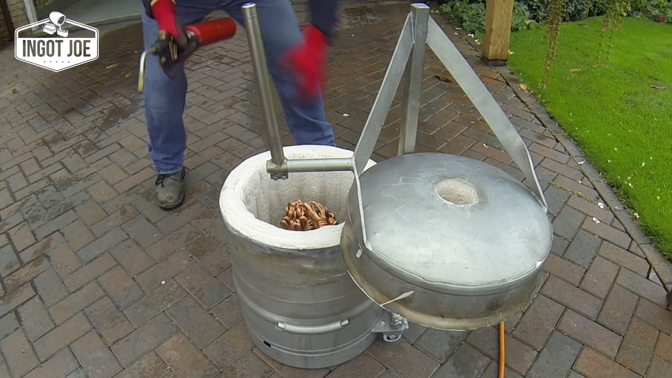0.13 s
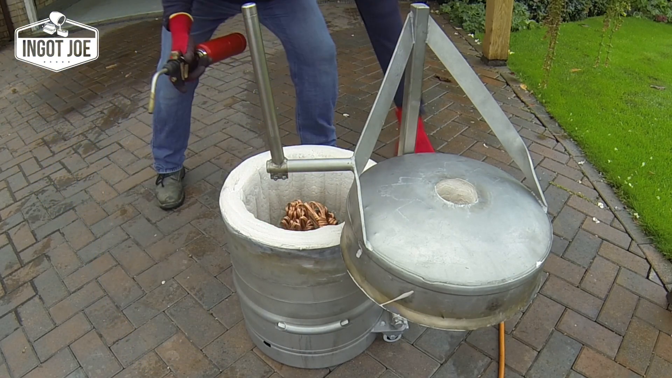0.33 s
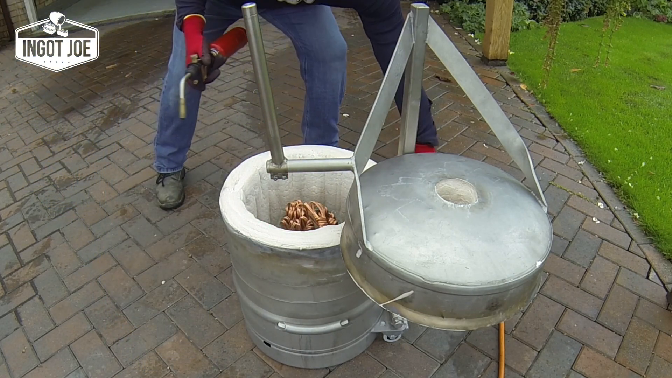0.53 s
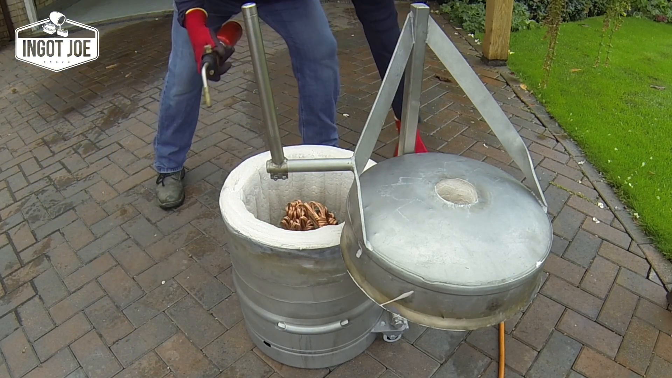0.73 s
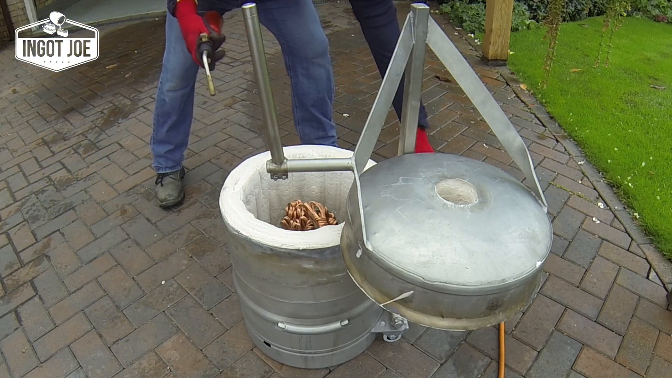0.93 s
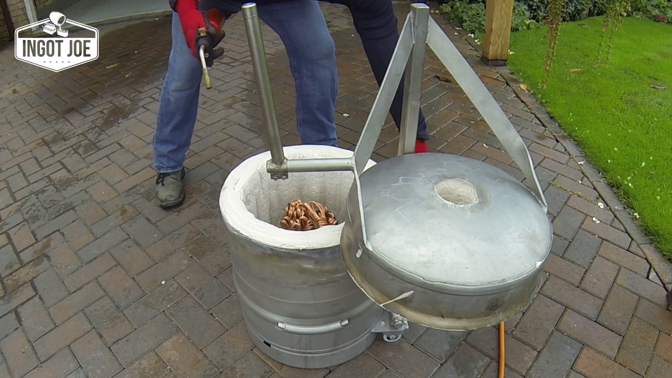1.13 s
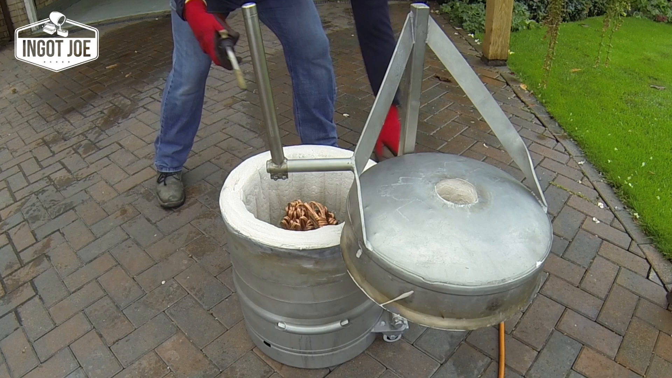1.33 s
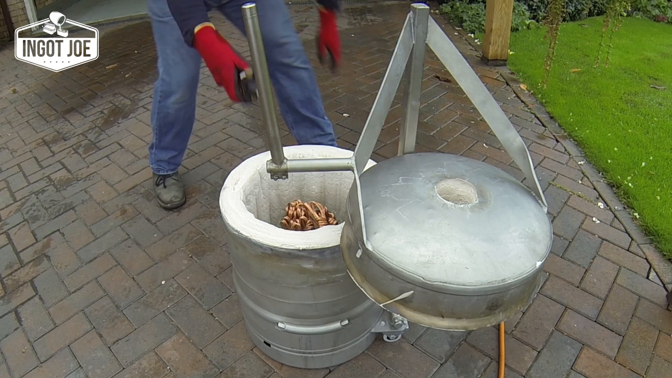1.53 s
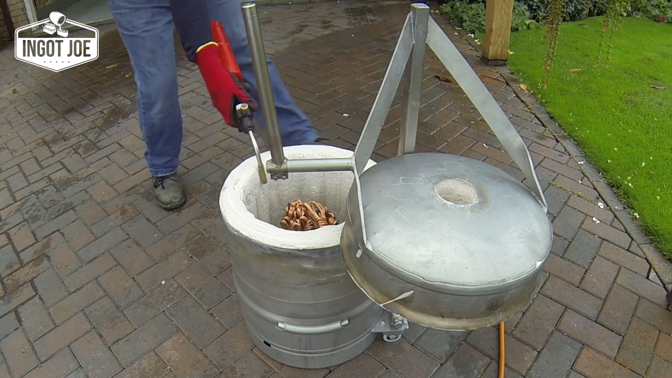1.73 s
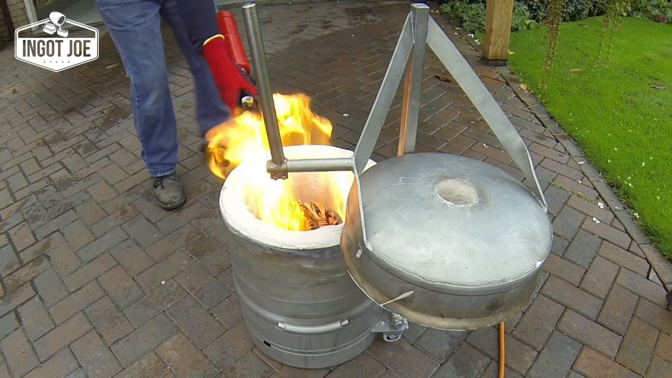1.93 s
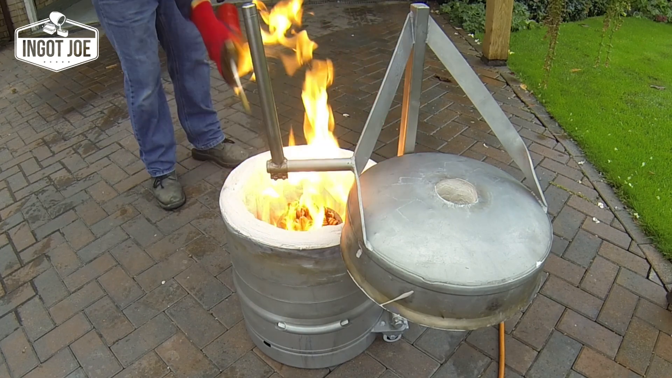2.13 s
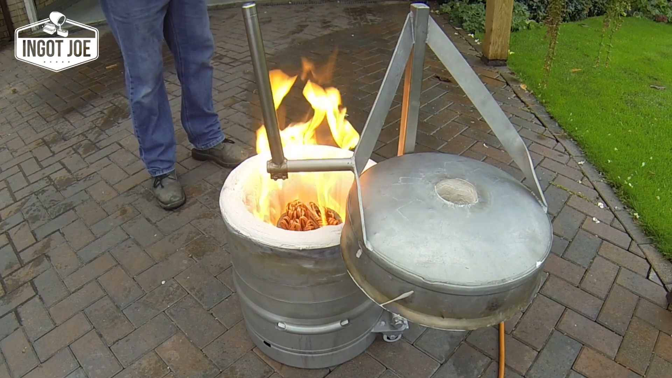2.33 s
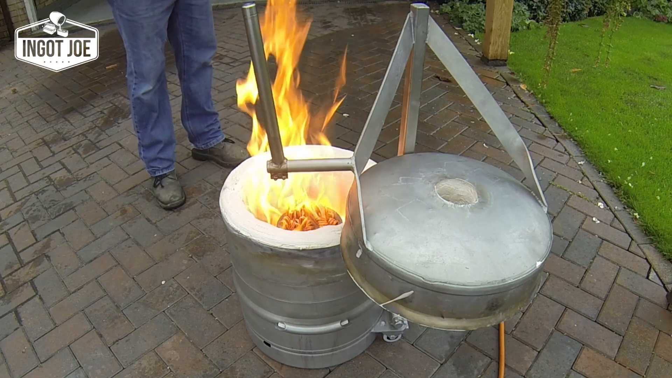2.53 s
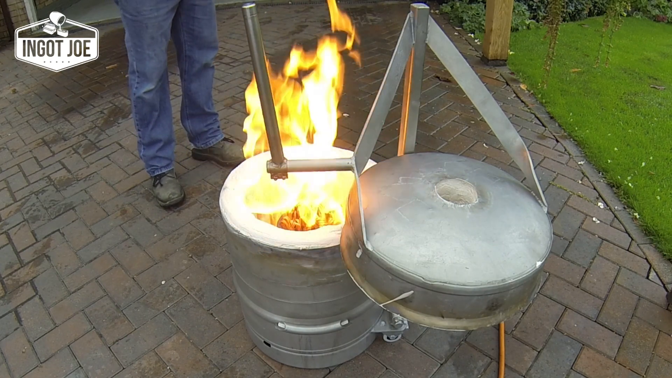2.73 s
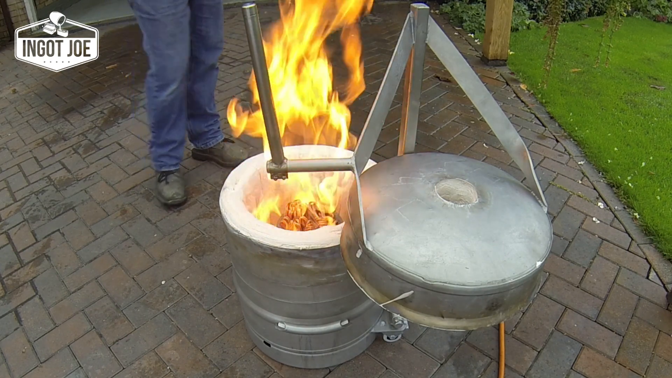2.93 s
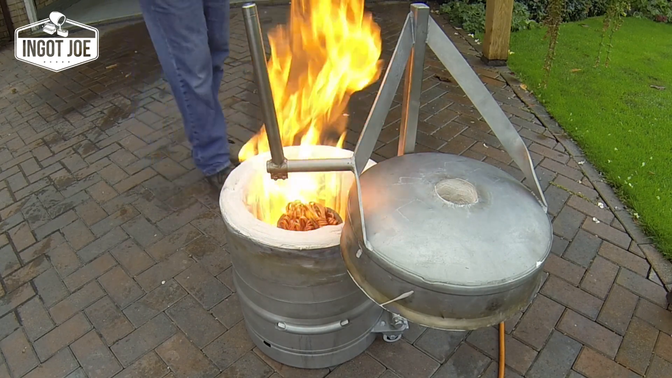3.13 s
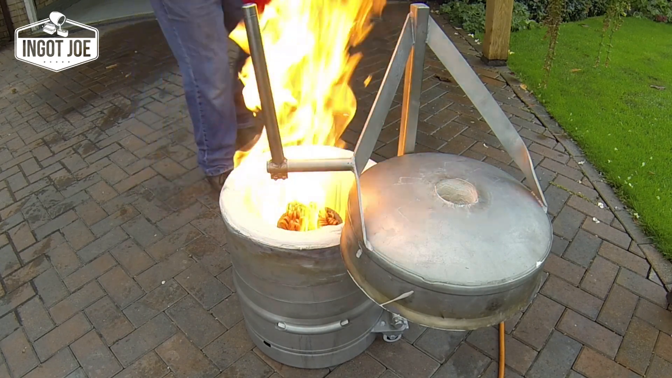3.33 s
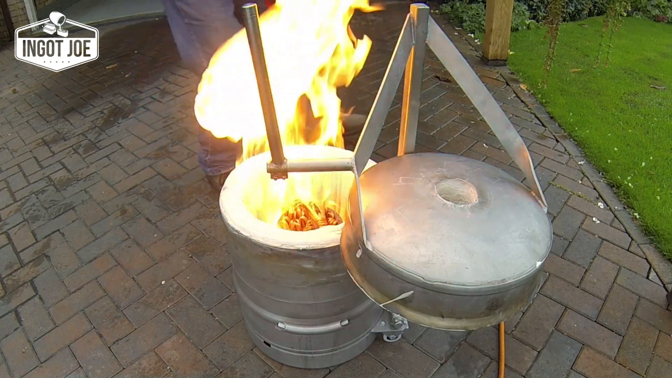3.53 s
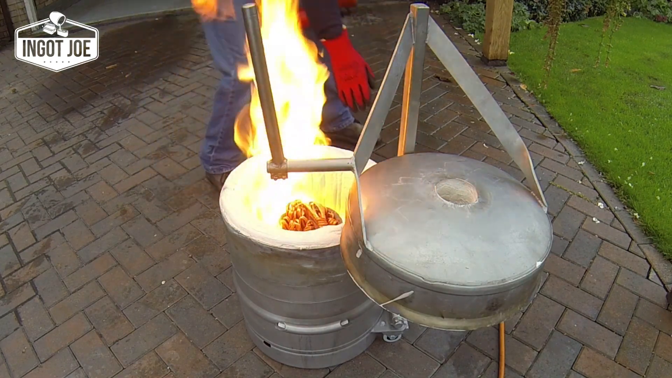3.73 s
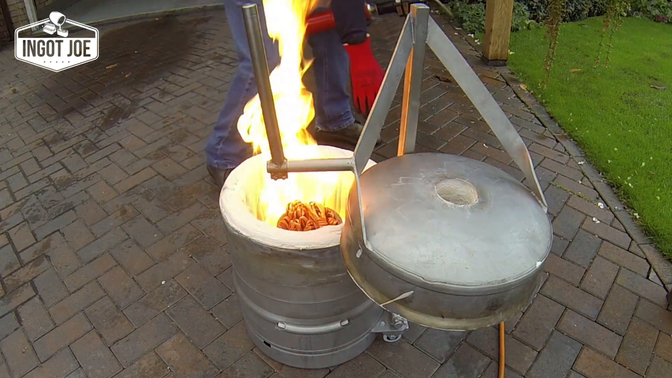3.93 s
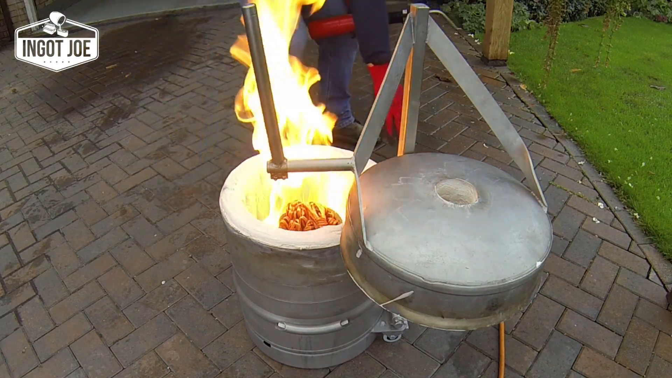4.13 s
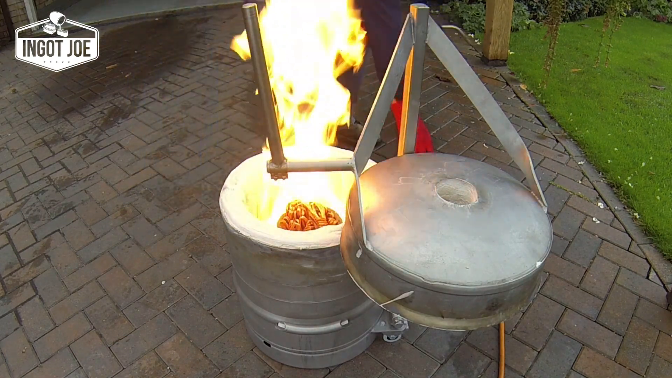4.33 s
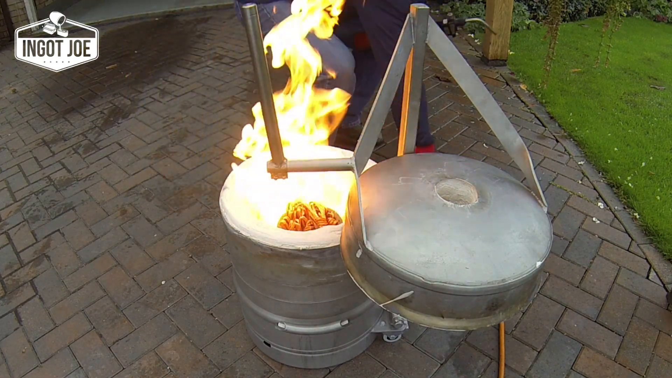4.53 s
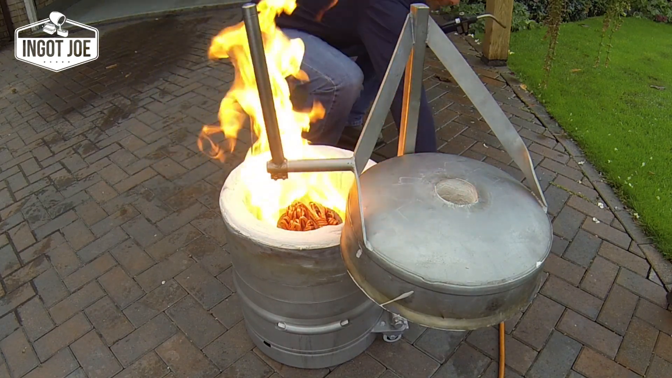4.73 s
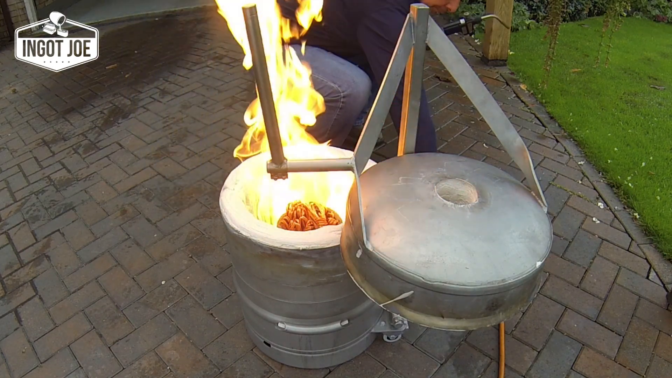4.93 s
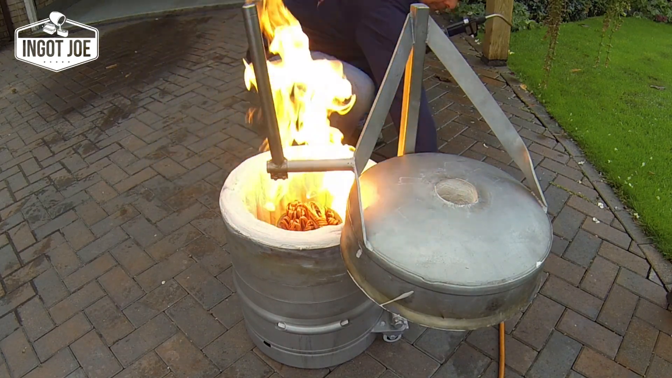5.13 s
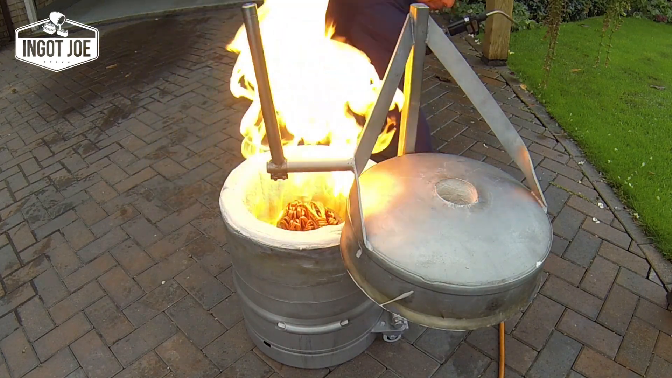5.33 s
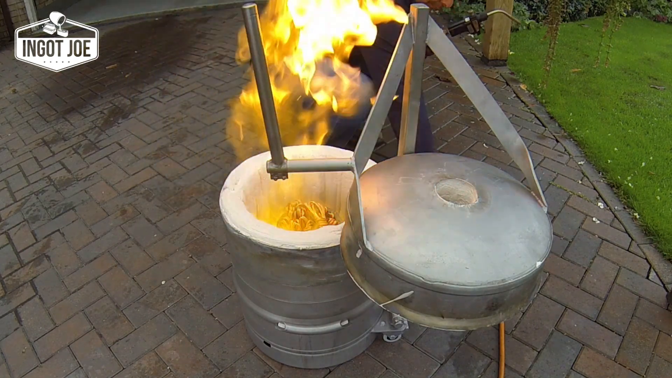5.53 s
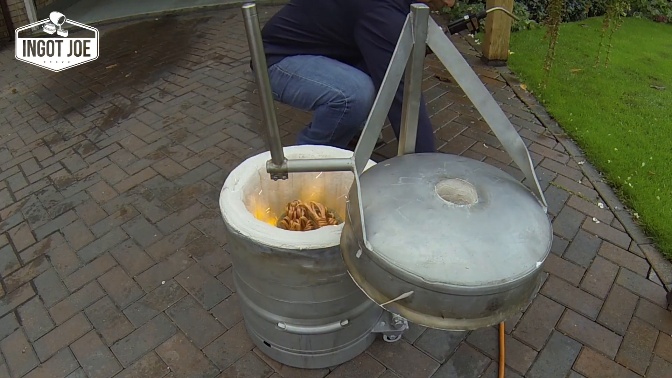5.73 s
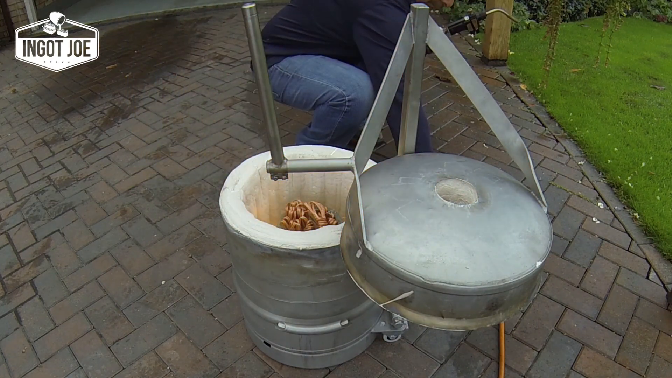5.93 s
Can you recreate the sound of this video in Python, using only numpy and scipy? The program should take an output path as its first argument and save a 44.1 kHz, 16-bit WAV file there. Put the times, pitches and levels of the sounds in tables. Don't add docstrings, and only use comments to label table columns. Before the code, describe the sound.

On a paved yard with faint traffic hum, boots step and a lighter is handled. A valve opens with a soft puff and a bright steady gas hiss. A lighter snaps and the gas ignites in a short thumping whoosh, followed by a soft low flutter under the hiss with scattered footsteps. Finally metal scrapes as the valve is jerked up, and a booming roar builds in the drum. Close stereo camera microphone.

```python
import sys
import numpy as np
from scipy import signal
from scipy.fft import rfft, irfft, next_fast_len
from scipy.io import wavfile

SR = 44100
rng = np.random.default_rng(int(sys.argv[2]) if len(sys.argv) > 2 else 0)


def bounce(signal):
    frames = np.transpose(np.atleast_2d(signal))
    limited = np.clip(frames, -1, 1)
    pcm = np.round(limited * 32767).astype(np.int16)
    wavfile.write(sys.argv[1], SR, pcm)


def voltage_ratio(decibels):
    exponent = np.asarray(decibels, float) / 20
    return 10 ** exponent


N = 268833
SIZE = next_fast_len(N + SR // 2)
HZ = np.fft.rfftfreq(SIZE, 1 / SR)
LIGHTS_S = 1.72
# (frequency [Hz], width [Hz], lift [dB])
DRUM_MODES = [(77, 33, 8.5), (159.7, 14, 8.5), (232.9, 3.7, 13.5), (308, 21, 6), (358.7, 28, 11),
              (467.6, 13, 9.5), (553, 48, 8), (750, 62, 4.5)]


def rms_one(x):
    return x / np.sqrt(np.mean(x ** 2) + 1e-20)


def in_time(rows, start=None):
    s, *columns = np.transpose(rows)
    first = round((start or s[0]) * SR)
    t = np.arange(first, min(round(s[-1] * SR), N)) / SR
    return [first] + [np.interp(t, s, column) for column in columns]


def at_hz(points, grid):
    hz, value = np.transpose(points)
    return np.interp(np.log(grid + 1), np.log(hz), value)


def placed(first, x):
    return np.pad(x, (first, N - first - len(x)))


def ramp(t, start, length):
    return np.clip((t - start) / np.clip(length, .003, 1), 0, 1)


def lifts(modes, grid):
    peaks = [(voltage_ratio(db) ** 2 - 1) / (1 + (2 * (grid - hz) / width) ** 2) for hz, width, db in modes]
    return np.sqrt(1 + sum(peaks))


def drift(rate, size):
    r = np.exp(-80 * np.pi * rate / SR)
    chance = rng.standard_normal(N // 40 + 2002)
    slow = rms_one(signal.lfilter([1], [1, -2 * r, r * r], chance)[2000:])
    return np.interp(np.arange(size) / 40, np.arange(len(slow)), slow)


def ring(drive, hz, t60):
    r, w = voltage_ratio(-60 / (t60 * SR)), 2 * np.pi * hz / SR
    return signal.lfilter([0, np.sin(w)], [1, -2 * r * np.cos(w), r * r], drive + 1e-18)


def turbulence(size, colour, modes, centres, shared_db, own_db, rate):
    padded = next_fast_len(size + 4096)
    grid = np.fft.rfftfreq(padded, 1 / SR)
    noise = rfft(rng.standard_normal(N + 8192)[:padded], padded)
    noise = noise * voltage_ratio(at_hz(colour, grid)) * lifts(modes, grid)
    noise = noise / (1 + (grid / (2 * colour[-1][0])) ** 4)
    noise = noise * grid ** 2 / (grid ** 2 + colour[0][0] ** 2)
    together = shared_db * drift(rate, size)
    bands = []
    for one in np.eye(len(centres)):
        share = at_hz(list(zip(centres, one)), grid)
        flicker = voltage_ratio(together + own_db * drift(2 * rate, size))
        bands.append(irfft(noise * share, padded)[:size] * flicker)
    bands = np.array(bands)
    return bands / np.std(bands.sum(axis=0))


def traffic():
    # (frequency [Hz], density [dB per Hz])
    yard_colour = [(25, -19), (45, 2), (65, 11), (100, -2.5), (200, -4.5), (500, -15.5), (1000, -11.5),
                   (2000, -36.5), (4000, -31), (9000, -26.5), (13000, -28.5), (15500, -41)]
    # (time [s], level [dB])
    swell = [(0.0, -53.5), (0.208, -59.5), (0.894, -58.5), (1.03, -59.5)]
    level_db = -51.5
    centres = [60, 180, 600, 2500, 9000]
    hum = turbulence(N, yard_colour, [], centres, shared_db=.3, own_db=.8, rate=5.0).sum(axis=0)
    s, swell_db = np.transpose(swell)
    return voltage_ratio(level_db + np.interp(np.arange(N) / SR, s, swell_db - swell_db.mean())) * hum


def steps():
    # (time [s], peak [dB], pitch of the sole [Hz], t60 [s], hardness of the heel [dB])
    boots = [
        (0.037, -30.5, 484, 0.14, -43),
        (0.475, -43.5, 261, 0.043, -15),
        (2.207, -33.5, 305, 0.025, -16),
        (2.715, -32, 327, 0.12, -32),
        (3.093, -29.5, 340, 0.029, -14),
        (3.574, -30.5, 363, 0.031, -24),
        (3.654, -28, 504, 0.11, -11),
        (3.923, -49, 340, 0.051, -10),
        (4.227, -29, 284, 0.037, -9),
        (4.764, -69, 316, 0.093, 21.5),
    ]
    slap_delay_s, slap_share = .0115, 0.23
    t = np.arange(SR // 4) / SR
    out = np.zeros(N + SR)
    chance = rng.standard_normal((len(boots), 2, len(t)))
    for (s, db, hz, t60, hard_db), (noise, grit) in zip(boots, chance):
        slap = slap_share * (np.arange(len(t)) == round(slap_delay_s * SR))
        drive = (t == 0) + slap + 0.072 * noise * np.exp(-t / 0.019)
        body = ring(drive, hz, t60)
        body = body - 0.48 * ring(drive, 0.653 * hz, t60) - 1.03 * ring(drive, 1.43 * hz, 0.11 * t60)
        thump = 0.15 * ring(drive, 210, 0.027)
        scuff = 0.057 * ring(grit * np.exp(-t / 0.07), 1.24 * hz, 0.0098)
        heel = ring(grit * np.exp(-t / 0.019), 970, 0.0052)
        hit = body + thump + scuff
        step = hit / np.abs(hit).max() + voltage_ratio(hard_db + 4.5) * heel / np.abs(heel).max()
        out[round(s * SR):][:len(t)] += voltage_ratio(db - 1.0) * step
    return out[:N]


def bird():
    # (start [s], end [s], first pitch [Hz], last pitch [Hz])
    start, end, first_hz, last_hz = (.161, .218, 1660, 1740)
    level_db = -58
    t = np.arange(N) / SR
    phase = 2 * np.pi * np.cumsum(np.interp(t, [start, end], [first_hz, last_hz])) / SR
    gate = np.interp(t, [start, start + .004, end - .006, end], [0, 1, 1, 0])
    return voltage_ratio(level_db + 1.5 * drift(30, N)) * gate * np.sin(phase)


def scrapes():
    # (time [s], peak [dB], length [s], ring of the metal [dB])
    slips = [
        (0.253, -50, 0.014, -7),
        (0.563, -43, 0.031, -6.5),
        (0.691, -51.5, 0.04, -15),
        (1.958, -26.5, 0.019, -5.5),
        (5.177, -23, 0.039, -11.5),
        (5.456, -39, 0.03, -15),
        (5.483, -26.5, 0.03, -4.5),
        (5.729, -24, 0.021, -23),
        (5.767, -22, 0.053, -9),
    ]
    # (frequency [Hz], level [dB], t60 [s])
    lighter_modes = [(1980, -7, .01), (2850, -5, .01), (4900, -7, .008), (5800, -8, .008)]
    # (frequency [Hz], level [dB], t60 [s])
    valve_modes = [(1200, -4, .006), (1560, -3, .007), (1830, -2, .007), (2280, -4, .006), (6130, 2, .07),
                   (6900, -8, .03), (7970, -6, .03), (8600, 0, .017), (13500, -10, .006)]
    lighter_away_s = 2.5
    t = np.arange(SR // 4) / SR
    out = np.zeros(N + SR)
    chance = rng.standard_normal((len(slips), 2, len(t)))
    for (s, db, length, metal_db), (noise, roughness) in zip(slips, chance):
        envelope = np.minimum(t / .004, 1) * np.exp(-(t / np.clip(length, .008, .07)) ** 2)
        slip = noise * voltage_ratio(3 * roughness) * envelope
        modes = lighter_modes if s < lighter_away_s else valve_modes
        bright = signal.lfilter([1, -1], [1, -.88], signal.lfilter([.7, .3], [1, -.25], slip))
        metal = sum(voltage_ratio(mode_db) * ring(slip, hz, t60) / np.sqrt(t60 * SR) for hz, mode_db, t60 in modes)
        out[round(s * SR):][:len(t)] += voltage_ratio(db - 7.5) * (bright + voltage_ratio(14.5 + metal_db) * metal)
    return out[:N]


def song(modes, first):
    shape = sum(voltage_ratio(db) / (1 + (2 * (HZ - hz) / width) ** 2) for hz, width, db in modes)
    return rms_one(irfft(rfft(rng.standard_normal(SIZE)) * shape, SIZE)[first:N])


def tube_levels(first):
    cold_db, lit_db, rest_db, blown_db = -62, -46.5, -61, -51
    fade_db_per_s = 6.5
    next_cold_db, warming_db_per_s = -70, 2.5
    drowned_s, drowned_db = 5.1, -72
    blown_s, rise_s = 5.2, .06
    t = np.arange(first, N) / SR
    lit = np.maximum(lit_db - fade_db_per_s * (t - LIGHTS_S), rest_db)
    lowest = cold_db + ramp(t, LIGHTS_S, rise_s) * (lit - cold_db)
    lowest = lowest + ramp(t, blown_s, rise_s) * (blown_db - lowest)
    warm = next_cold_db + warming_db_per_s * (t - t[0])
    return lowest, warm + ramp(t, drowned_s, rise_s) * (drowned_db - warm)


def jet():
    # (time [s], level [dB])
    flow = [(1.15, -42.5), (1.4, -43.5), (1.66, -43), (1.77, -44), (1.91, -49), (2.15, -46), (2.4, -48),
            (2.66, -45), (2.79, -48), (3.01, -46.5), (3.35, -47.5), (3.86, -47.5), (4.3, -45), (4.83, -48),
            (5.12, -45), (5.31, -50.5), (5.53, -43.5), (6.1, -48.5)]
    # (start [s], fully open [s])
    valve_opens = (1.034, 1.058)
    # (frequency [Hz], density [dB per Hz])
    jet_colour = [(200, -26), (500, -20.5), (1000, -10.5), (2000, -10.5), (3000, -7), (4500, -6.5),
                  (8000, 0), (11500, 0.5), (14000, -1), (15500, -5.5)]
    # (frequency [Hz], width [Hz], lift [dB])
    tube_low = [(1354, 40, 10), (1845, 100, 5.5), (2380, 36, 3), (2604, 54, 3)]
    # (frequency [Hz], width [Hz], lift [dB])
    tube_high = [(2550, 500, -9.5), (3173, 20, 5.5), (3680, 37, 6.5), (3977, 41, 6.5), (4420, 18, 10.5),
                 (5016, 210, 5.5), (5600, 27, 3), (6240, 62, 3.5), (6960, 55, 0)]
    waver_db = 1.5
    first, hiss_db = in_time(flow, valve_opens[0])
    lowest_db, next_db = tube_levels(first)
    centres = [800, 2000, 2600, 3300, 4200, 5300, 6700, 8500, 11500, 14000]
    hiss = turbulence(N - first, jet_colour, tube_high, centres, shared_db=.4, own_db=1.2, rate=5.0)
    hiss = hiss.sum(axis=0)
    sing = voltage_ratio(lowest_db) * song(tube_low[:1], first) + voltage_ratio(next_db + 7.5) * song(tube_low[1:], first)
    sing = sing * voltage_ratio(waver_db * drift(3.3, N - first))
    opening = np.interp(np.arange(N) / SR, valve_opens, [0, 1]) ** 2
    return opening * placed(first, voltage_ratio(hiss_db + 9.0) * hiss + sing)


def flame(size, colour, shared_db, own_db, rate):
    centres = [50, 100, 200, 370, 800, 1600, 3200]
    bands = turbulence(size, colour, DRUM_MODES, centres, shared_db, own_db, rate)
    return [rms_one(part.sum(axis=0)) for part in (bands[:3], bands[3:4], bands[4:5], bands[5:])]


def lazy():
    # (time [s], level [dB])
    flame_size = [(1.05, -50), (1.6, -60.5), (1.76, -38), (1.88, -63), (2.03, -51), (2.3, -56.5),
                  (2.49, -53.5), (2.93, -46), (3.13, -48.5), (3.58, -46.5), (3.9, -54.5), (4.22, -51.5),
                  (4.54, -48.5), (4.73, -57), (4.96, -46.5), (5.2, -61), (5.3, -73)]
    # (frequency [Hz], density [dB per Hz])
    lazy_colour = [(25, -23), (45, 0), (70, 1.5), (110, -3), (200, -9), (320, -7), (500, -18.5), (800, -22),
                   (1500, -24)]
    first, size_db = in_time(flame_size)
    rumble, body, rasp, upper = flame(len(size_db), lazy_colour, shared_db=1.5, own_db=1.5, rate=4.6)
    body_db = -56 + 0.36 * (size_db - size_db.mean())
    burning = body + voltage_ratio(-5) * rasp + voltage_ratio(-19) * upper
    return placed(first, voltage_ratio(size_db + 1.2) * rumble + voltage_ratio(body_db) * burning)


def puffs():
    # (time [s], peak [dB], pitch of the push [Hz])
    pockets = [(1.06, -28.5, 256), (1.726, -11.5, 140), (1.793, -13.5, 80.7), (2.209, -22.5, 95),
               (2.869, -23, 87.5), (3.189, -38, 82.5), (5.236, -12, 277), (5.292, -2.5, 157),
               (5.396, -5.5, 320), (5.611, -6, 335), (5.686, -4, 90), (5.787, 2, 131), (5.834, 7.5, 153),
               (5.938, 6, 105), (5.963, -1, 143), (6.055, -3, 77.4)]
    push = np.zeros(SIZE)
    for s, db, hz in pockets:
        cycle = np.arange(int(1.5 * SR / hz)) / SR
        at = round(s * SR)
        push[at:at + len(cycle)] -= voltage_ratio(db - 2.0) * np.sin(2 * np.pi * hz * cycle) * np.hanning(len(cycle))
    ringing = sum((voltage_ratio(db) - 1) / (1 + 2j * (HZ - hz) / width) for hz, width, db in DRUM_MODES)
    return irfft(rfft(push) * (1 + ringing) * voltage_ratio(-11.5), SIZE)[:N]


def whoosh():
    # (attack [s], peak [dB], sag, negative for a swell [dB per s], release [dB per s])
    flame_parts = [
        (.016, -28, 32, 144),
        (.03, -38.5, -17, 145),
        (.04, -31.5, 47, 110),
        (.045, -26, 59, 86),
    ]
    # (frequency [Hz], density [dB per Hz])
    whoosh_colour = [(25, -17), (50, -3), (100, -6), (160, 0.5), (250, -3), (350, -9), (450, -15),
                     (700, -10), (1000, -4.5), (1600, -11.5), (2500, -15.5), (4000, -20.5), (7000, -19.5)]
    attack_db, spent_s, ends_s = 12, 1.958, 2.2
    first = round(LIGHTS_S * SR)
    t = np.arange(first, round(ends_s * SR)) / SR
    parts = flame(len(t), whoosh_colour, shared_db=2.5, own_db=-0.5, rate=25.0)
    burning = np.minimum(t, spent_s) - LIGHTS_S
    spent = np.maximum(t - spent_s, 0)
    out = np.zeros(len(t))
    for part, (attack, db, sag, release) in zip(parts, flame_parts):
        leap = attack_db * (1 - ramp(t, LIGHTS_S, attack))
        out += part * voltage_ratio(db - leap - sag * burning - release * spent)
    return placed(first, out)


def snap():
    # (start [s], length [s])
    start, length = (1.7208, .011)
    t = np.arange(SR // 20) / SR
    rattle = rng.standard_normal(len(t)) * np.exp(-(t / length) ** 4) * (1 + 1.8 * np.exp(-t / 0.0022))
    high = signal.sosfilt(signal.butter(2, 2400, "high", fs=SR, output="sos"), rattle)
    return voltage_ratio(-24) * placed(round(start * SR), high)


def roar():
    # (time [s], level [dB])
    power = [(5.16, -54), (5.2, -35.5), (5.3, -27), (5.46, -22), (5.65, -23.5), (5.7, -21), (5.75, -22.5),
             (5.85, -19), (6.096, -16.5)]
    # (level at full power [dB], share of the swing in power [dB per dB])
    part_levels = [
        (-16.5, 1.27),
        (-19.5, 1.21),
        (-37.5, 0.88),
        (-41, 0.18),
    ]
    # (frequency [Hz], density [dB per Hz])
    roar_colour = [(25, -26), (50, -13), (75, -10), (150, -4), (220, -11), (340, -6), (430, -14),
                   (550, -14), (700, -15.5), (1000, -20.5), (1400, -27), (2200, -35.5), (3200, -41.5)]
    full_db = -16.5
    first, power_db = in_time(power)
    parts = flame(len(power_db), roar_colour, shared_db=1.2, own_db=2.2, rate=7.0)
    swing = power_db - full_db
    return placed(first, sum(part * voltage_ratio(db + share * swing) for part, (db, share) in zip(parts, part_levels)))


def echoes(x):
    # (frequency [Hz], level [dB])
    echo_db = [(100, -25.5), (400, -16), (600, -6.5), (850, 15), (1050, -16.5), (1400, -6.5), (1900, 10.5),
               (2500, 13.5), (3300, -6.5), (3900, -11), (6000, -3), (9500, -68), (12000, -19), (14000, -23)]
    t60_s = 0.1
    t = np.arange(SR // 2) / SR
    tail = rng.standard_normal((2, len(t))) * voltage_ratio(-60 * t / t60_s) * (t > .004)
    tail = tail / np.sqrt(np.sum(tail ** 2, axis=1, keepdims=True))
    wet = voltage_ratio(at_hz(echo_db, HZ))
    path = (1 + wet * rfft(tail, SIZE)) / np.sqrt(1 + wet ** 2)
    return irfft(rfft(x, SIZE) * path, SIZE)[:, :N]


def scene():
    fire = jet() + lazy() + puffs() + whoosh() + snap() + roar()
    return echoes(traffic() + steps() + scrapes() + fire) + bird()


def outside(bands):
    return np.prod([(HZ < low) | (HZ > high) for low, high in bands], axis=0)


def top_cut(x):
    return signal.sosfilt(signal.butter(12, 16920, fs=SR, output="sos"), x)


def record(dry):
    # (frequency [Hz], left leads [rad])
    lead_points = [(0, 0), (300, 0.38), (450, 0.57), (880, 3.5), (1150, 4.5), (1350, 7.5), (2400, 2.5),
                   (2700, 2), (3300, -2), (3500, 1), (4300, -0.56), (8200, -2), (8900, -2.5), (10500, -5),
                   (12900, -4.5), (13400, -12.5)]
    # (frequency [Hz], left minus right [dB])
    tilt = [(60, 1.5), (92, -1), (140, 0.0), (210, -0.5), (330, -1), (500, 4), (770, 2.5), (1170, -2.5),
            (1790, 1.5), (2740, -4), (4190, -0.5), (6410, 0.0), (9810, -0.5), (15000, 0)]
    # (low [Hz], high [Hz])
    no_side = [(3480, 4220), (13200, 22050)]
    # (low [Hz], high [Hz])
    no_mid = [(9050, 10330)]
    # (frequency [Hz], level [dB])
    mid_edges = [(2350, 1), (2650, -2), (3000, 0), (8100, 0), (8500, -3), (9050, -5), (10330, -26),
                 (10850, -11), (11200, 0)]
    low_cut_hz, top_cut_hz, self_noise_db = 44.2, 15950, -66.5
    lead = np.interp(HZ, *np.transpose(lead_points))
    sides = np.array([[.5], [-.5]])
    spread = np.exp(1j * sides * lead) * voltage_ratio(sides * at_hz(tilt, HZ))
    ratio = 1j * HZ / low_cut_hz
    passed = (ratio ** 2 / (1 + 1.35 * ratio + ratio ** 2)) ** 2 * (HZ < top_cut_hz)
    hiss = voltage_ratio(self_noise_db) * signal.lfilter([1], [1, -.6], rng.standard_normal(dry.shape))
    left, right = rfft(dry + hiss, SIZE) * spread * passed
    mid = (left + right) / 2 * outside(no_mid) * voltage_ratio(at_hz(mid_edges, HZ))
    side = (left - right) / 2 * outside(no_side)
    mix = irfft([mid + side, mid - side], SIZE)[:, :N]
    return top_cut(mix)


dry = scene()
out = record(dry)
bounce(out)
```